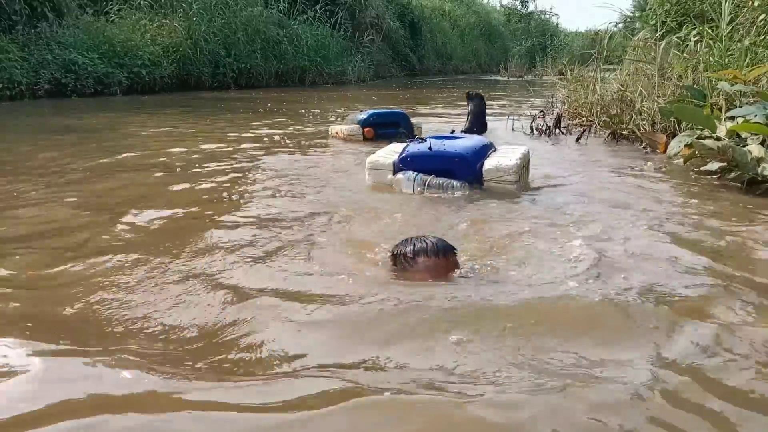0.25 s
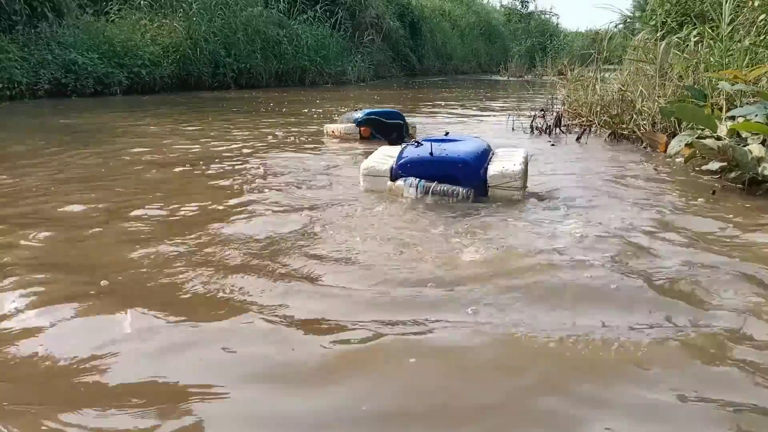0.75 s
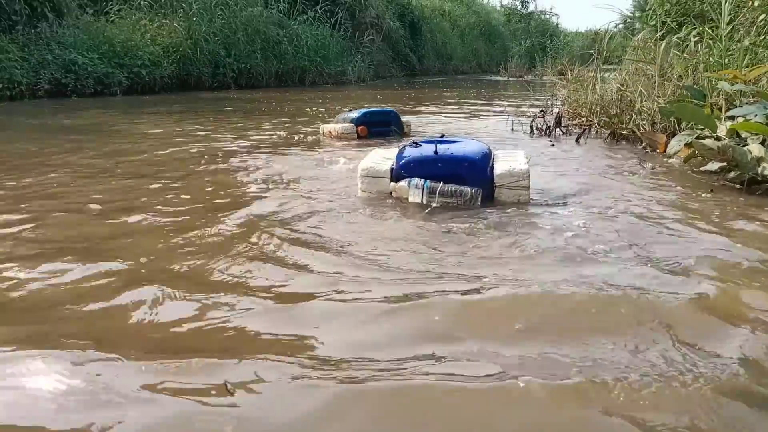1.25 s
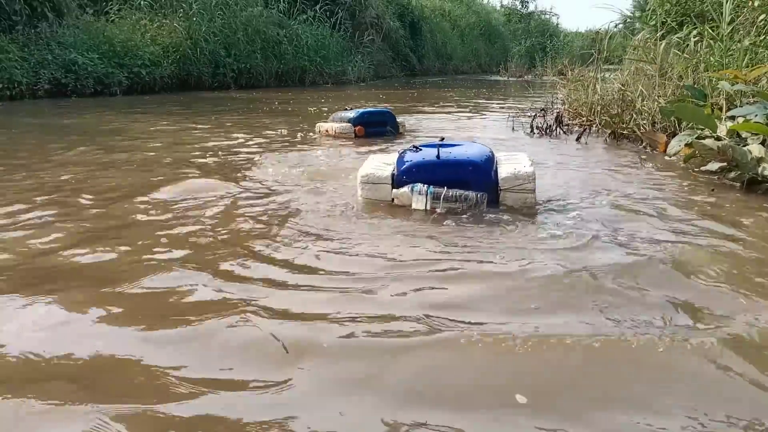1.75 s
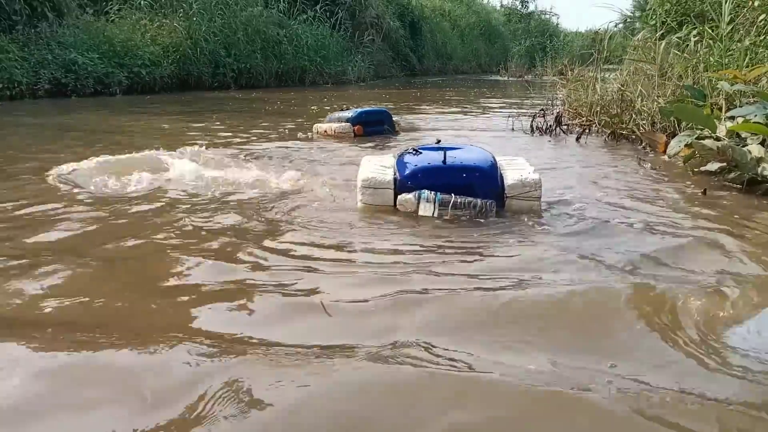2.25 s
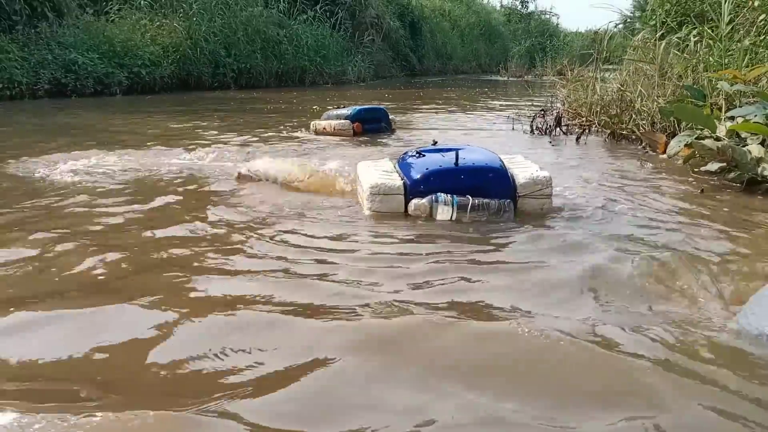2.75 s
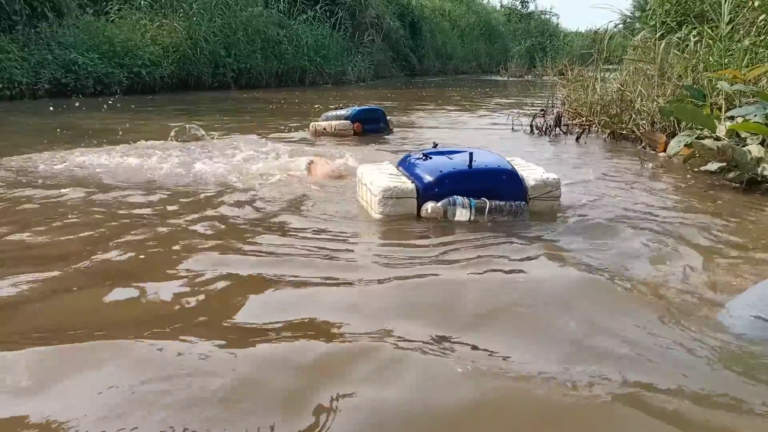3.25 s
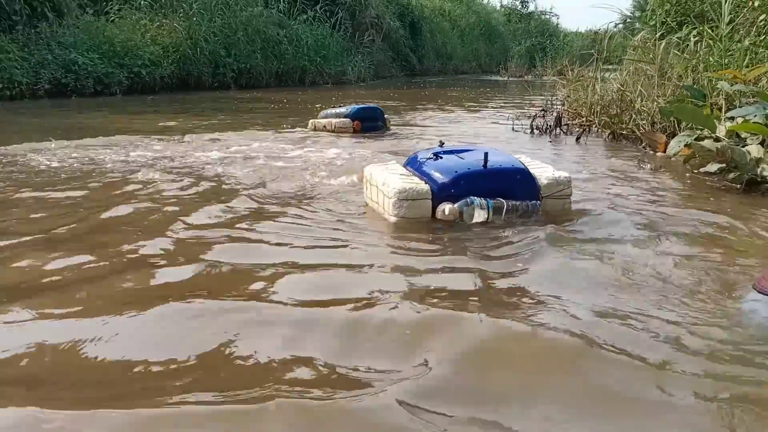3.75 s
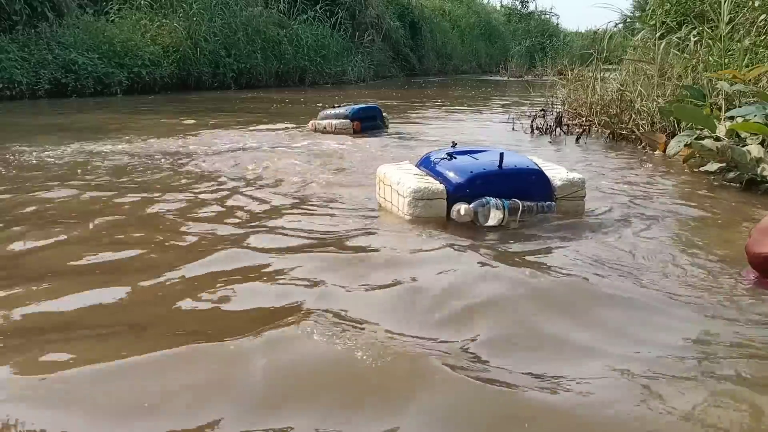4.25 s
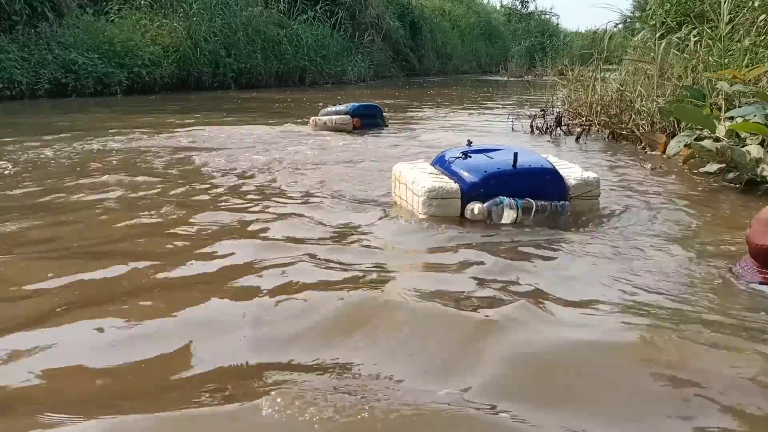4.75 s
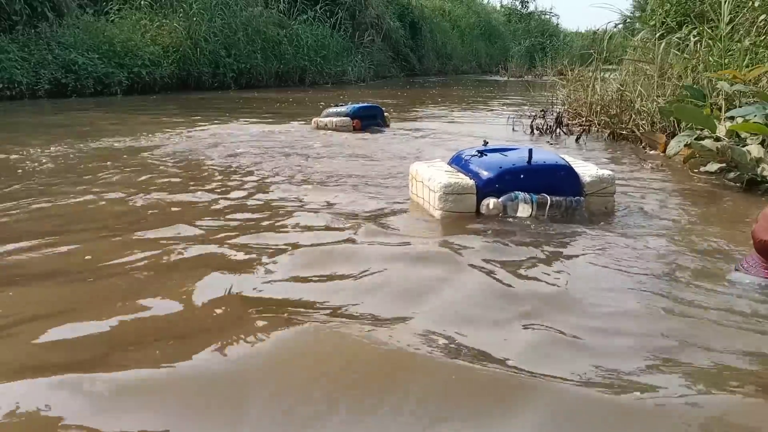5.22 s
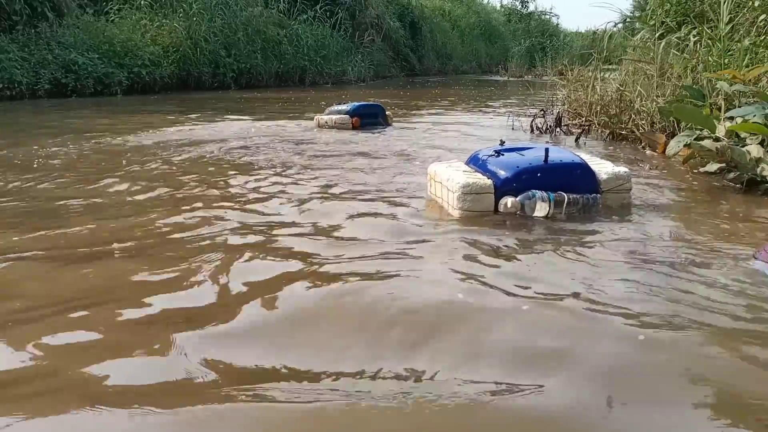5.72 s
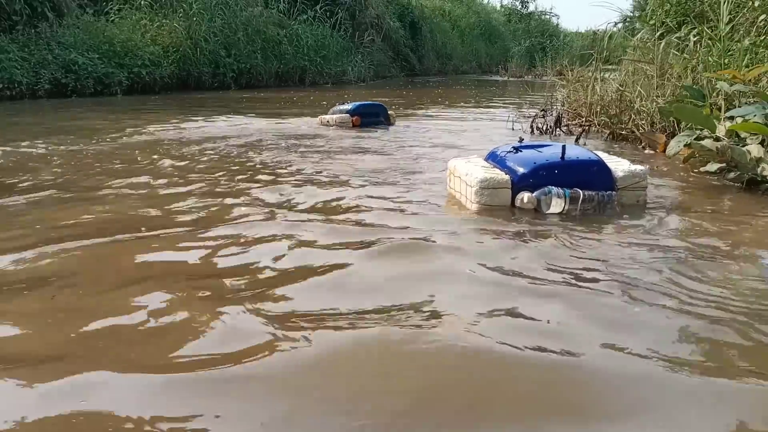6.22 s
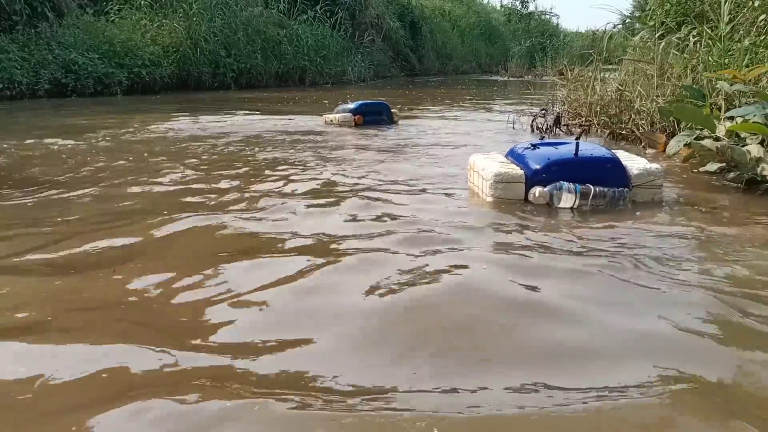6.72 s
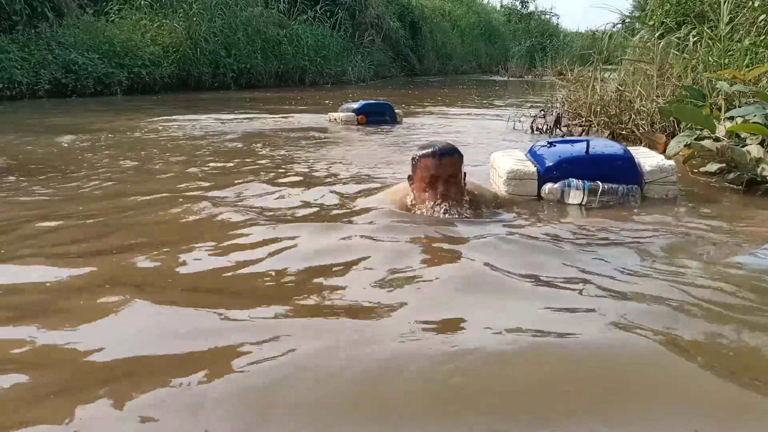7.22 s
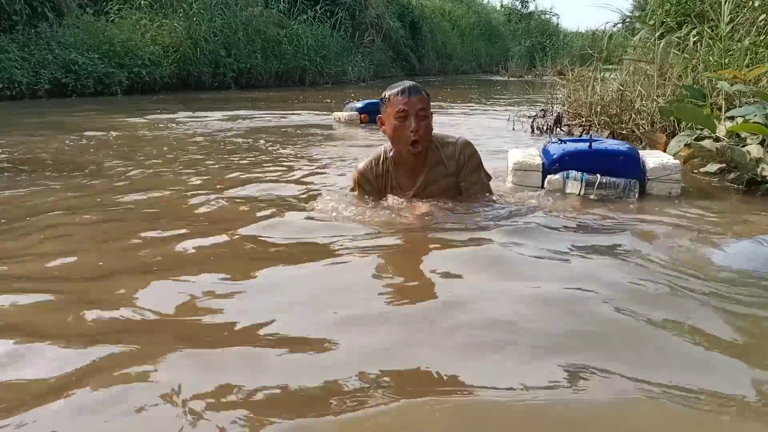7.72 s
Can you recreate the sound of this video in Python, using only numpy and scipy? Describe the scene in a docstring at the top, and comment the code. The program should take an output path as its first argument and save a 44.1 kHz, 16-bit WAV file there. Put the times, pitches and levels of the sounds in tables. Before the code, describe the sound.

A swimmer ducks under muddy river water, kicks up two heavy splashes, then resurfaces with a softer gurgling rush; ripples lap close by.

```python
"""A muddy river bank, microphone near the water: a swimmer ducks under, kicks up two splashes and surfaces again.
In between, ripples lap and gurgle close by, spray patters, and bright rustles sound like a hand on the recorder.
Ringing bubbles and filtered drop noise make the water and rustles; spikes with noise tails make slaps and short rustles.
Behind it, narrow noise bands shrill as insects, gliding whistles chirp as birds in the reeds,
and the low exhaust orders of a slow engine thud far away."""
import sys
import numpy as np
from scipy import signal
from scipy.fft import rfft, irfft, next_fast_len
from scipy.io import wavfile
from scipy.ndimage import uniform_filter1d

SR = 44100
rng = np.random.default_rng(int(sys.argv[2]) if len(sys.argv) > 2 else 0)


def log_audio(samples):
    """Write samples as a 16-bit WAV file to the path given in sys.argv[1]."""
    # one column per channel
    frames = np.atleast_2d(samples).T
    # limit to full scale, then quantise
    limited = np.clip(frames, -1, 1)
    pcm = np.round(limited * 32767).astype(np.int16)
    wavfile.write(sys.argv[1], SR, pcm)


N = 351951
TIME = np.arange(N) / SR

# Gain curves for big bubbles, splash and fine spray: (frequency [Hz], gain [dB])
CHURN_COLOUR = [(71, -51.5), (120, -22), (161, -16.5), (271, -4), (339, -2.5), (410, 2), (451, 0.5),
                (509, 2), (585, -1), (950, -9.5), (1240, 0.5), (2090, -120)]
SPLASH_COLOUR = [(410, -12.5), (700, -2), (798, -11), (870, -5.5), (1730, -8.5), (2170, -6), (2720, -7),
                 (3100, -3.5), (3560, -9.5), (5600, -14), (7280, -36.5), (12300, -120)]
SPRAY_COLOUR = [(2710, -8.5), (4600, -7), (5320, -6), (5970, -3.5), (6590, -3), (7170, -5.5), (7750, -1.5),
                (8780, 0), (9850, -7.5), (11300, -3.5), (14800, -6.5), (15600, -3.5), (16000, -25)]


def water_and_rustles():
    """Big bubbles churn, small ones and drop impacts splash, fine drop noise hisses as spray or rustle."""
    churn_db, splash_db, spray_db, deep_db, fine_db = agitation()
    drops = droplets(per_s=1600, spread_db=1.5)
    clumps = from_db(2.0 * drift(110))   # sheets of water land in clumps

    big = bubble_cloud(124.2, 993, cycles=22.3, spread_db=3.0, rise=0.51, count=2400)
    small = bubble_cloud(680, 5920, cycles=26, spread_db=3.0, rise=0.15, count=3400)
    plinks = bubble_cloud(700, 5600, cycles=53, spread_db=2.5, rise=0.23, count=1800)
    fizz = bubble_cloud(4800, 14000, cycles=40, spread_db=5.5, rise=0.06, count=1000)
    big = coloured(big, CHURN_COLOUR)
    small = coloured(small, SPLASH_COLOUR)
    plinks = coloured(plinks, SPLASH_COLOUR)
    fizz = coloured(fizz, SPRAY_COLOUR)

    froth = coloured(drops + 0.5 * rng.standard_normal(N), SPLASH_COLOUR)
    froth = patchy(froth, depth_db=2.5, count=3)
    mist = coloured(drops + 1.9 * rng.standard_normal(N), SPRAY_COLOUR)
    mist = patchy(mist, depth_db=2.8, count=3)

    # In gentle water the long-ringing plinks stand out of the froth
    calm = np.clip((-46 - splash_db) / 10, 0, 1)
    # Flying spray is bright, gurgling is dull
    airborne_db = np.clip(1.86 * (spray_db - splash_db + 1), -6, 8)
    grains = 0.64 * small + froth + (0.2 + 1.4 * calm) * plinks
    grains = tilted(grains, 2100, airborne_db * (0.56 + 0.75 * calm))
    hiss = tilted(mist + 0.45 * fizz, 10500, fine_db - spray_db)

    # The deep level sets the lowest part, the tilt brings the rest to the churn level
    gulps = tilted(evened(big, window_s=0.038), DEEP_HZ, churn_db - deep_db)
    churn = from_db(deep_db - 1.5) * gulps
    splash = from_db(splash_db - 2.5) * evened(grains * clumps, window_s=0.015)
    spray = from_db(spray_db - 1.4) * evened(hiss * clumps, window_s=0.091)
    return churn + splash + spray


# Big splashes, two kicks and the surfacing: (time [s], attack [s], time the thrown water keeps falling [s],
# release [dB/s], base level [dB], extra at impact [dB], churn against base [dB], spray against base [dB],
# finest mist against spray [dB], change of that [dB/s])
SPLASHES = [(2.033, 0.014, 0.42, 81.8, -38.5, 4.9, 2, -5.5, -6.5, 11),
            (2.897, 0.0055, 0.54, 85.3, -38.5, 9.8, -1, -3.5, -5, 0),
            (7.328, 0.057, 0.39, 36, -42, 3.8, 1.7, -4.5, -0.5, -12)]
IMPACT_S = 0.061   # time scale on which the first blow dies away
LANDING_DB, LANDING_S = 2, 0.02   # the last thrown water lands together: extra level, spread in time
# Big bubbles are spent first
CHURN_SAG_DB_PER_S, SPLASH_SAG_DB_PER_S, SPRAY_SAG_DB_PER_S = 16.5, 7.5, 12
# The deepest gulps, mostly below this frequency, come early in a splash
DEEP_HZ, SPLASH_DEEP_DB, DEEP_SAG_DB_PER_S = 259, 7, 18
# Wavelets that fold over and gurgle close by:
# (time [s], length [s], base level [dB], churn against base [dB], spray against base [dB])
WAVELETS = [(0.088, 0.182, -57, 2.5, -13.5), (.215, 0.25, -49.5, -6, -9), (0.448, 0.19, -59, -0.5, 0),
            (0.623, 0.17, -56, -9, -2.5), (0.722, 0.18, -67, 5.5, 0), (0.828, 0.29, -67, 5, -8),
            (0.978, 0.2, -62, -16, -8.5), (1.068, 0.22, -59, -1, -5), (1.188, 0.24, -56.5, -5, -7),
            (1.408, 0.15, -66, 1.5, -3), (2.298, 0.22, -42, -0.5, -6), (2.598, 0.077, -51, -27, -3.5),
            (2.773, 0.14, -52, 0, -4), (2.978, 0.068, -42, 3, 0.5), (3.148, .12, -41.5, -2.5, -5),
            (3.728, 0.043, -51, -3.5, -5), (3.888, 0.18, -55.5, 5, -3.5), (4.03, 0.11, -51.5, -3, -7),
            (4.238, 0.23, -48, -2, -8), (4.428, 0.2, -58.5, -1, -7.5), (4.622, 0.16, -56.5, -14, -10),
            (4.743, 0.12, -61.5, 1.5, -3), (4.878, 0.065, -69, -0.5, -3), (6.898, 0.16, -72, -2, -2),
            (7.306, 0.048, -64, -13, -6), (7.582, 0.17, -46, -1, -18), (7.943, 0.087, -49.5, 0, -9)]
WAVELET_ATTACK_SHARE, WAVELET_RELEASE_SHARE = 0.12, 0.65   # of its length
WAVELET_DEEP_DB, WAVELET_FINE_DB = 1, -7   # against churn, against spray
# Showers of spray, and bright rustles like a hand rubbing the recorder:
# (time [s], length [s], level [dB], finest part against it [dB])
SHOWERS_AND_RUSTLES = [(.02, 0.074, -61, -9), (1.062, 0.12, -55.5, -17), (1.16, 0.21, -51, -5),
                       (1.328, 0.13, -55.5, 9.5), (1.497, 0.37, -60, 9), (1.717, 0.12, -50, 5),
                       (1.812, 0.1, -46, 0), (2.728, .085, -38, -14), (3.702, 0.13, -48, -5),
                       (4.54, 0.32, -53, 5), (4.688, 0.19, -48, -12), (6.671, 0.23, -63, 9.5),
                       (6.898, 0.17, -68.5, 3.5)]
SHOWER_ATTACK_SHARE, SHOWER_RELEASE_SHARE = 0.3, 0.56   # of its length
SHOWER_SPLASH_DB, SHOWER_CHURN_DB = -10, -27   # few bubbles in either
# Restless ripples: (time [s], level [dB])
RIPPLES = [(0, -59), (.45, -60), (.75, -69), (1.0, -78), (1.3, -68), (1.65, -66), (1.95, -67.5), (2.7, -60),
           (3.9, -59), (4.5, -72), (5.0, -71), (5.45, -75.5), (5.7, -81.5), (6.05, -72), (6.5, -79),
           (6.95, -76), (7.22, -83), (7.98, -56.5)]
RIPPLE_CHURN_DB, RIPPLE_SPRAY_DB = -6.5, 1   # against the ripple level
RIPPLE_DEEP_DB, RIPPLE_FINE_DB = -5.5, -1.5   # against churn, against spray


def agitation():
    """Add water movements and rustles in power: dB of churn, splash, spray, deepest gulps, finest hiss."""
    power = np.full((5, N), 1e-14)   # keeps the logarithm finite

    def add_movement(churn, splash, spray, deep_db, fine_db):
        """Mix in one movement."""
        deep = churn * from_db(deep_db)
        fine = spray * from_db(fine_db)
        for total, gain in zip(power, (churn, splash, spray, deep, fine)):
            total += gain ** 2

    for (s, attack_s, fall_s, release_db_per_s, db, impact_db,
         churn_db, spray_db, fine_db, fine_db_per_s) in SPLASHES:
        t = np.maximum(TIME - s, 0)
        impact = impact_db * np.exp(-(t / IMPACT_S) ** 2)
        landing = LANDING_DB * np.exp(-((t - fall_s) / LANDING_S) ** 2)
        release = release_db_per_s * np.maximum(t - fall_s, 0)
        body = np.minimum(t / attack_s, 1) * from_db(db + impact + landing - release)
        add_movement(body * from_db(churn_db - CHURN_SAG_DB_PER_S * t),
                     body * from_db(-SPLASH_SAG_DB_PER_S * t),
                     body * from_db(spray_db - SPRAY_SAG_DB_PER_S * t),
                     SPLASH_DEEP_DB - DEEP_SAG_DB_PER_S * t,
                     fine_db + fine_db_per_s * t)
    for s, length_s, db, churn_db, spray_db in WAVELETS:
        wave = from_db(db) * swell(s, length_s, WAVELET_ATTACK_SHARE, WAVELET_RELEASE_SHARE)
        add_movement(wave * from_db(churn_db), wave, wave * from_db(spray_db),
                     WAVELET_DEEP_DB, WAVELET_FINE_DB)
    for s, length_s, db, fine_db in SHOWERS_AND_RUSTLES:
        hiss = from_db(db) * swell(s, length_s, SHOWER_ATTACK_SHARE, SHOWER_RELEASE_SHARE)
        add_movement(hiss * from_db(SHOWER_CHURN_DB), hiss * from_db(SHOWER_SPLASH_DB), hiss,
                     0, fine_db)
    ripples = from_db(in_time(RIPPLES)[0])
    add_movement(ripples * from_db(RIPPLE_CHURN_DB), ripples, ripples * from_db(RIPPLE_SPRAY_DB),
                 RIPPLE_DEEP_DB, RIPPLE_FINE_DB)
    return 10 * np.log10(power)


def swell(s, length_s, attack_share, release_share):
    """Attack, hold and release of one movement."""
    u = (TIME - s) / length_s
    return np.clip(np.minimum(u / attack_share, (1 - u) / release_share), 0, 1)


def bubble(hz, t60, rise, swell_cycles):
    """A trapped air pocket swells, rings and decays while its pitch slides by the relative rise per t60."""
    t = np.arange(int(t60 * SR) + 2) / SR
    onset = 1 - np.exp(-(t * hz / swell_cycles) ** 2)
    decay = np.exp(-np.log(1000) * t / t60)
    return onset * decay * np.sin(2 * np.pi * hz * t * (1 + rise * t / t60 / 2))


def bubble_cloud(low_hz, high_hz, cycles, spread_db, rise, count):
    """Many bubbles ring at random moments, with random pitch, strength and damping."""
    out = np.zeros(N)
    for when, size, strength, damping in rng.random((count, 4)):
        hz = low_hz * (high_hz / low_hz) ** size
        gain = from_db(spread_db * min(-np.log(1 - strength), 3.2)) * hz / low_hz
        ring = bubble(hz, cycles * (0.5 + damping) / hz, rise, swell_cycles=cycles / 18)
        add(out, when * N / SR, gain * ring)
    return out


def droplets(per_s, spread_db):
    """Drops strike as single-sample impacts: many small ones, a few large; rms 1."""
    strength_db = spread_db * np.minimum(rng.exponential(1, N), 4.2)
    impacts = from_db(strength_db) * rng.choice([-1, 1], N)
    return rms_one(impacts * (rng.random(N) < per_s / SR))


# Loudest bubbles, near the microphone; the long ones stand for quick runs of bubbles:
# (time [s], pitch [Hz], level before a common lift [dB], t60 [s], relative rise of pitch over t60 [1])
GLUGS = [(0.048, 3250, -49.5, 0.12, 0.11), (.119, 913, -30.5, 0.032, 0.52),
         (0.129, 537, -32, 0.031, -0.0089), (.203, 517, -35.5, 0.063, 0.025),
         (.260, 1238, -46.5, 0.092, 0.13), (0.321, 1770, -29, 0.013, .2), (0.333, 185, -35, 0.096, -0.27),
         (0.366, 915, -26.5, 0.021, 0), (0.402, 199, -33, 0.043, -0.39), (.452, 836, -44.5, .045, -0.054),
         (.633, 1070, -41, 0.082, 1), (.688, 1980, -46, 0.054, 0.066), (.818, 211, -47, 0.45, -0.072),
         (0.857, 251, -43.5, 0.13, 0.6), (0.926, 334, -42, 0.13, 0.27), (.926, 766, -47, 0.033, 0.021),
         (0.951, 1150, -52, 0.059, 0.58), (1.123, 331, -35.5, .064, 0.1), (1.211, 3180, -42.5, 0.028, -.2),
         (2.059, 337, -16, 0.032, -0.14), (2.075, 165, -33, 0.07, 0.14), (2.078, 3200, -29, 0.022, -.14),
         (2.135, 904, -26.5, 0.039, -0.022), (2.148, 6270, -27, .012, 0.27), (2.148, 283, -21, 0.057, 0.3),
         (2.172, 870, -27, 0.025, -0.045), (2.214, 440, -18, 0.029, 0.15), (2.252, 2820, -23.5, 0.015, -.2),
         (2.490, 2150, -35, 0.03, -0.031), (2.524, 514, -35, 0.071, .57), (2.558, 856, -43, 0.05, 0.33),
         (2.666, 1250, -48, 0.049, 0.25), (2.903, 543, -20, .031, 0.037), (2.965, 184, -29.5, 0.061, 0.94),
         (3.086, 880, -30, 0.054, 0.74), (3.174, 173, -34, .1, .55), (3.259, 400, -26.5, 0.052, -0.076),
         (3.309, 1624, -38, 0.057, -.16), (3.44, 419, -42.5, 0.19, -0.17), (3.505, 408, -39, 0.092, -0.6),
         (3.572, 1180, -40, 0.03, 0.17), (3.751, 168, -40.5, 0.072, -0.15), (3.898, 376, -19, 0.038, 0.82),
         (3.904, 212, -29.5, 0.087, 0.018), (3.918, 2220, -42, 0.028, 0.091), (3.945, 640, -42, 0.054, .3),
         (3.97, 1054, -48.5, 0.065, .45), (4.035, 2220, -44, 0.033, 0.07), (4.052, 603, -36, 0.05, 0.51),
         (4.075, 415, -37.5, 0.092, 0.22), (4.078, 784, -42, 0.09, .44), (4.090, 1070, -47, .042, .3),
         (4.123, 1380, -49.5, 0.053, 0.47), (4.230, 1150, -41, 0.059, -0.21),
         (4.232, 1730, -46, .087, 0.023), (4.258, 254, -41.5, 0.19, 0.17), (4.294, 246, -24, 0.039, 0.23),
         (4.325, 1290, -36, 0.033, 0.025), (4.330, 758, -38, 0.059, -0.21), (4.381, 810, -35, 0.032, 0.024),
         (4.467, 2810, -43, .027, .1), (4.468, 426.5, -51, 0.26, 0), (4.727, 977, -46.5, .031, -0.22),
         (4.757, 2980, -32.5, 0.025, 0.25), (4.815, 485, -42, 0.033, -1.1),
         (6.181, 2020, -48.5, 0.021, -0.34), (6.190, 187, -55, 0.13, -0.082),
         (6.662, 1250, -53, 0.033, -0.21), (6.945, 993, -60.5, 0.067, 0.33), (7.329, 195, -44.5, 0.074, 0),
         (7.341, 281, -24.5, 0.034, -0.69), (7.342, 2207, -37.5, .024, 0), (7.361, 438, -31, 0.15, -0.11),
         (7.399, 591, -24.5, 0.088, -0.27), (7.482, 1130, -32, 0.023, -0.035),
         (7.502, 2218, -35.5, 0.027, 0), (7.534, 495, -27.5, 0.079, -0.14), (7.620, 442, -31, 0.15, .47),
         (7.682, 710, -28.5, 0.032, 0.22), (7.705, 1230, -37.5, 0.036, 0.059),
         (7.828, 1010, -32.5, 0.022, 0.45), (7.848, 840, -37, 0.036, 0.21), (7.94, 155, -46, 0.17, -.8)]


def glugs():
    """Cavities close and ring, swelling over their first cycles; a long ring stands for a quick run of them."""
    out = np.zeros(N)
    for s, hz, db, t60, rise in GLUGS:
        add(out, s - 1 / hz, from_db(db + 2.0) * bubble(hz, t60, rise, swell_cycles=1.51))
    return out


# Slaps of water, and short bright rustles like a hand on the recorder: (time [s],
# spike level before a common trim [dB], tail level before band trims [dB], brightness [dB],
# t60 of the tail's first part [s])
SLAPS_AND_RUSTLES = [(0.026, -41, -52, -2, .025), (0.321, -44, -52, -2, .026), (0.367, -36, -54, 5, 0.044),
                     (0.816, -24.5, -63, -3.5, 0.044), (1.103, -31, -54, 7, 0.018),
                     (1.255, -43, -46, 3.5, 0.038), (1.302, -42, -49, 3, 0.022),
                     (1.829, -32, -54.5, 8, 0.072), (1.966, -36, -67, 24.5, 0.015),
                     (2.016, -39, -45, 2.5, 0.04), (2.029, -14, -38, -2, 0.012),
                     (2.04, -13.5, -34, -16, 0.018), (2.111, -21, -46, 4, 0.026),
                     (2.145, -29, -43, -19, 0.02), (2.435, -30, -35.5, 0, 0.028),
                     (2.734, -36, -47.5, 9.5, 0.17), (2.902, -17, -27, -10, .016),
                     (2.916, -22, -36, 0, .018), (2.94, -18, -35, -3, .022), (2.951, -21, -32, -8, .025),
                     (3.366, -13.5, -64, 15, .021), (3.569, -45, -52.5, -4, .025),
                     (3.698, -40, -54, 7, 0.038), (4.33, -42, -51.5, -21, 0.023),
                     (4.588, -54, -53, -1, 0.031), (4.758, -38, -46, -0.5, 0.08),
                     (5.084, -63, -59.5, -8.5, 0.048), (5.218, -36, -58.5, -8.5, .017),
                     (6.049, -34, -69, 12, 0.021), (6.171, -43, -59.5, 12, 0.017),
                     (6.256, -40, -72, 17, .04), (6.273, -43, -60.5, 18.5, 0.015),
                     (6.347, -50, -69, 17, 0.017)]
SLAP_EDGE_DB = -3.5   # low and high end against the middle


def slaps_and_rustles():
    """One spike at first contact, then a short noise tail: a slap of water, or a bright rustle."""
    out = np.zeros(N)
    t = np.arange(SR // 6) / SR
    for s, peak_db, mid_db, bright_db, t60 in SLAPS_AND_RUSTLES:
        low_db = mid_db + SLAP_EDGE_DB - bright_db
        high_db = mid_db + SLAP_EDGE_DB + bright_db
        decay = from_db(-60 * t / t60) + from_db(-23.0) * np.exp(-t / 0.039)
        burst = rng.standard_normal(len(t)) * decay
        contact = signal.unit_impulse(len(t), SR // 1000)
        parts = ((low_db + 9.5, 500, 1600), (mid_db + 11.0, 1600, 5500), (high_db + 6.5, 6500, 15500))
        spike, tail = sum(from_db(db) * band([contact, burst], low, high) for db, low, high in parts)
        add(out, s, from_db(peak_db - 5.5) * spike / np.abs(spike).max() + tail)
    return out


def banks(x, echo_db, decay_s):
    """Reeds and banks scatter a short, dull tail that starts after 6 ms."""
    t = np.arange(SR // 2) / SR
    tail = band(rng.standard_normal(len(t)), 360, 5000) * np.exp(-t / decay_s) * (t > 0.006)
    return from_db(echo_db) * signal.fftconvolve(x, tail / np.linalg.norm(tail))[:N]


# Faint far birds: (time [s], pitch [Hz], relative glide [1], length [s], level before lift and scatter [dB])
CHIRPS = [(5.446, 2850, -0.025, .06, -86), (5.557, 2286, 0.12, 0.059, -81),
          (5.771, 2615, -0.0055, 0.1, -77), (5.926, 3170, 0.099, 0.091, -72),
          (5.959, 4520, 0.078, 0.062, -67.5), (6.06, 3200, -0.087, 0.052, -81),
          (6.384, 3240, 0.015, 0.099, -71), (6.588, 5380, -.02, .04, -75.5),
          (6.635, 3480, -0.19, 0.035, -63)]


def birds():
    """Thin whistles glide and waver under a half-sine envelope."""
    out = np.zeros(N)
    waver = 1 + 0.028 * drift(450)
    for s, hz, glide, length_s, db in CHIRPS:
        u = np.linspace(0, 1, int(length_s * SR) + 2)
        pitch = hz * (1 + glide * u) * waver[int(s * SR):][:len(u)]
        whistle = np.sin(2 * np.pi * np.cumsum(pitch) / SR)
        add(out, s, from_db(db + 1.0) * np.sin(np.pi * u) * whistle)
    return out


# Insect song along the bank: (frequency [Hz], width [Hz], level [dB])
INSECTS = [(7180, 110, -76), (7100, 97, -82.5), (7220, 57, -78), (7350, 10, -80), (9000, 670, -90),
           (3020, 220, -94.5)]


def insects():
    """A chorus of narrow noise bands, heard as rasping tones."""
    out = np.zeros(N)
    for hz, width_hz, db in INSECTS:
        song = band(rng.standard_normal(N), hz - width_hz / 2, hz + width_hz / 2)
        out += from_db(db) * rms_one(song)
    return out


# Far engine: (time [s], firing rate [1/s], level as it carries on the air [dB])
ENGINE_SPEED = [(0, 17.4, 3), (2, 18.3, -0.5), (3.2, 16.6, 0.5), (4.6, 18.8, 0.5), (5.3, 17.7, 0),
                (5.7, 15.5, 0), (6.1, 18.1, 3.5), (6.5, 17.8, -4), (6.9, 16.2, -2.5), (7.98, 16.2, -3)]
# Its exhaust: (multiple of the firing rate [1], level before carrying and fading [dB])
ENGINE_ORDERS = [(2, -76), (3, -73.5), (4, -72), (5, -83), (6, -81.5)]


def engine():
    """Only the low orders of the exhaust carry this far, each fading on the air."""
    firings, carry_db = in_time(ENGINE_SPEED)
    turns = np.cumsum(firings) / SR
    out = np.zeros(N)
    for order, db in ENGINE_ORDERS:
        level = np.sqrt(2) * from_db(db + carry_db + 3.0 * drift(7))
        out += level * np.sin(2 * np.pi * (order * turns + rng.random()))
    return out


# Still air over the river: (frequency [Hz], gain [dB])
AIR_COLOUR = [(15, -34), (25, -0.5), (64, -4), (141, -9), (223, -17), (531, -20), (624, -27), (1650, -34.5),
              (3080, -28.5), (6210, -32.5), (7110, -14), (7920, -42.5), (9840, -38.5), (14800, -30.5),
              (16000, -49)]


def still_air():
    """Steady coloured noise is the quiet of the river bank."""
    return from_db(-70.5) * coloured(rng.standard_normal(N), AIR_COLOUR)


def from_db(db):
    """Decibels to gain."""
    return 10 ** (np.asarray(db) / 20)


def rms_one(x):
    """Scale to unit power."""
    return x / np.sqrt(np.mean(x ** 2) + 1e-20)


def in_time(rows):
    """Each column of a curve, at every sample."""
    s, *columns = np.transpose(rows)
    return [np.interp(TIME, s, c) for c in columns]


def add(out, s, sound):
    """Mix a sound in from time s."""
    at = int(np.clip(s * SR, 0, N - 1))
    out[at:at + len(sound)] += sound[:N - at]


def band(x, low_hz, high_hz):
    """Causal band-pass."""
    sos = signal.butter(2, [low_hz, min(high_hz, SR * 0.45)], "band", fs=SR, output="sos")
    return signal.sosfilt(sos, x)


def coloured(x, spectrum):
    """Shape a sound with a gain curve that falls away steeply outside its ends; rms 1."""
    hz, db = np.transpose(spectrum)
    size = next_fast_len(N)
    f = np.maximum(np.arange(size // 2 + 1) * SR / size, 1)
    skirts = np.minimum(f / hz[0], 1) ** 4 * np.minimum(hz[-1] / f, 1) ** 6
    gain = skirts * from_db(np.interp(np.log(f), np.log(hz), db))
    return rms_one(irfft(rfft(x, size) * gain, size)[:N])


def tilted(x, corner_hz, top_db):
    """Raise or lower everything above the corner, moment by moment."""
    sos = signal.butter(2, min(corner_hz, SR * 0.45), fs=SR, output="sos")
    low = signal.sosfiltfilt(sos, x)
    return low + from_db(top_db) * (x - low)


def drift(per_s):
    """Random wandering: straight lines between normal draws of spread 1."""
    return np.interp(TIME * per_s, np.arange(4000), rng.standard_normal(4000))


def evened(x, window_s):
    """Hold the power of a grain stream steady over spans longer than the window."""
    size = max(int(window_s * SR), 8)
    power = uniform_filter1d(uniform_filter1d(x ** 2, size), size)
    return x / np.sqrt(np.abs(power) + np.mean(x ** 2) / 1000)


def patchy(x, depth_db, count):
    """Bubbles of like size come in swarms: each narrow range of pitch swells and fades by itself."""
    cells = signal.stft(x, nperseg=512)[2]
    field = rng.standard_normal(cells.shape)
    for axis in (0, 1, 0, 1):
        field = uniform_filter1d(field, size=count, axis=axis)
    return rms_one(signal.istft(cells * from_db(depth_db * rms_one(field)))[1][:N])


def scene():
    """Near water and rustles over the quiet of the river bank."""
    near = water_and_rustles() + glugs() + slaps_and_rustles()
    near_echo = banks(near, echo_db=-16.5, decay_s=0.035)
    far_birds = banks(birds(), echo_db=-2.5, decay_s=0.0067)   # only their scattered sound arrives
    mix = near + near_echo + far_birds + insects() + engine() + still_air()
    return mix[None]


def record(dry):
    """The microphone signal is cut steeply above 15.7 kHz."""
    return signal.sosfilt(signal.ellip(12, 0.1, 80, 15700, fs=SR, output="sos"), dry)


dry = scene()
out = record(dry)
log_audio(out)
```